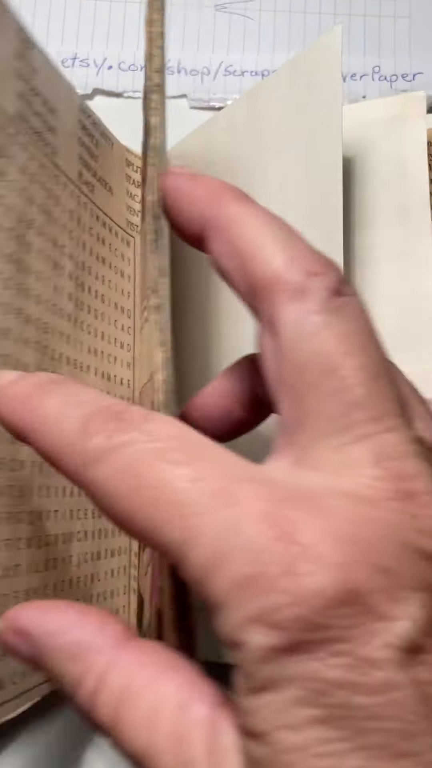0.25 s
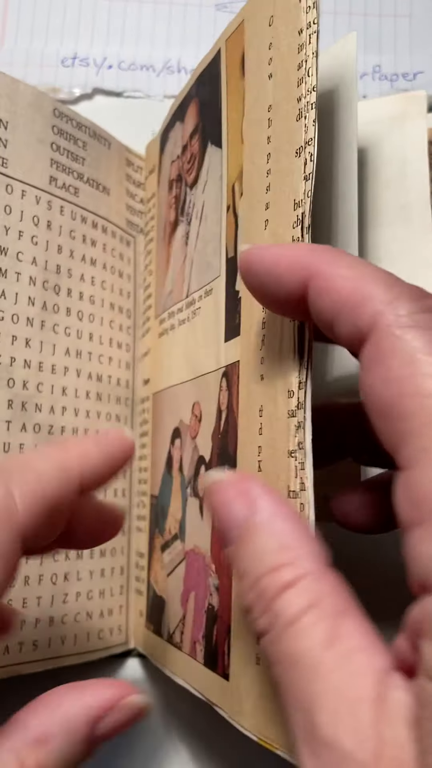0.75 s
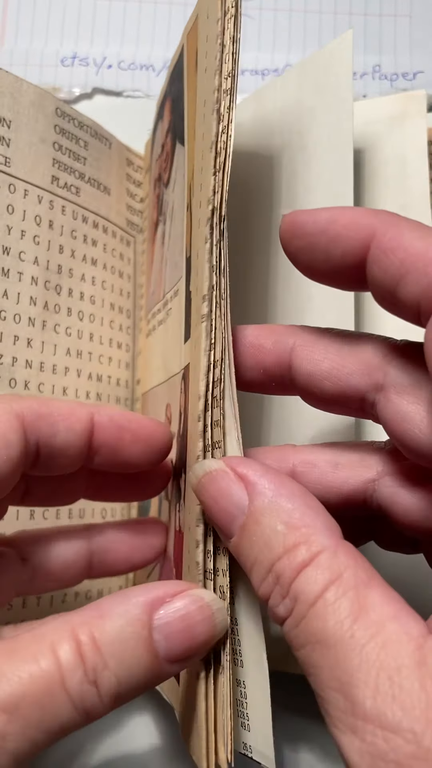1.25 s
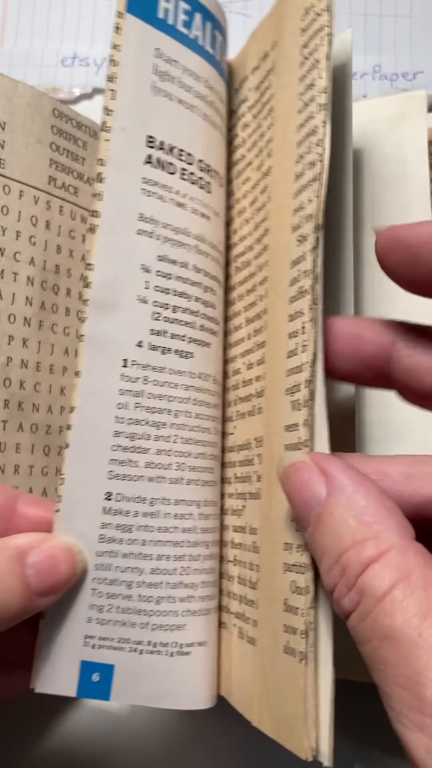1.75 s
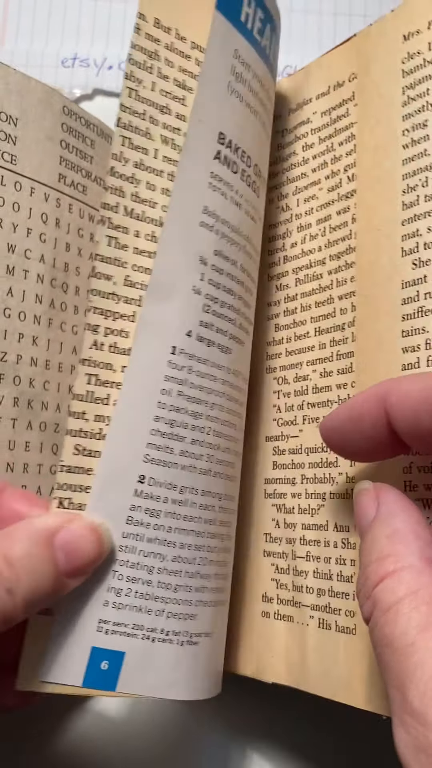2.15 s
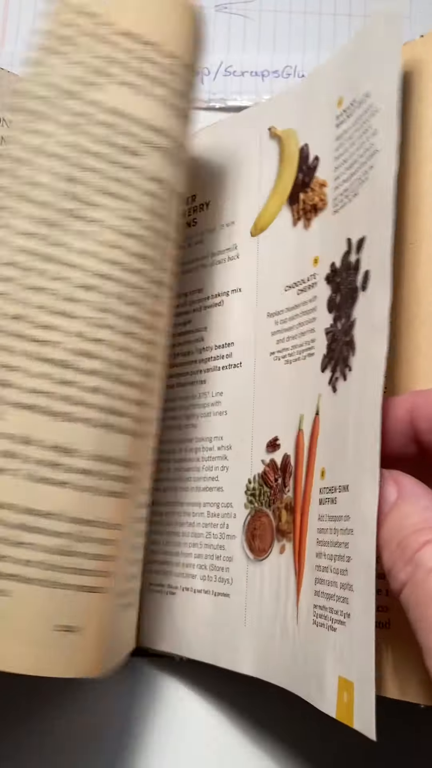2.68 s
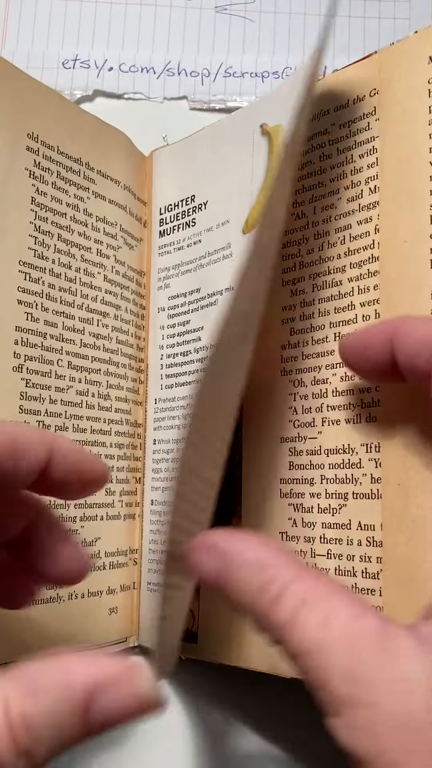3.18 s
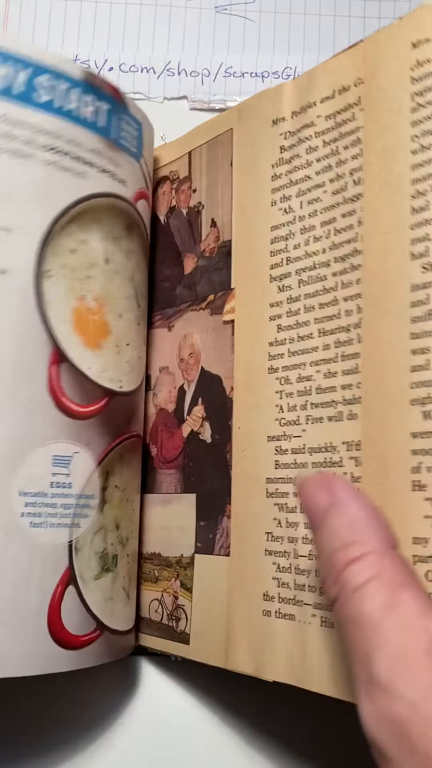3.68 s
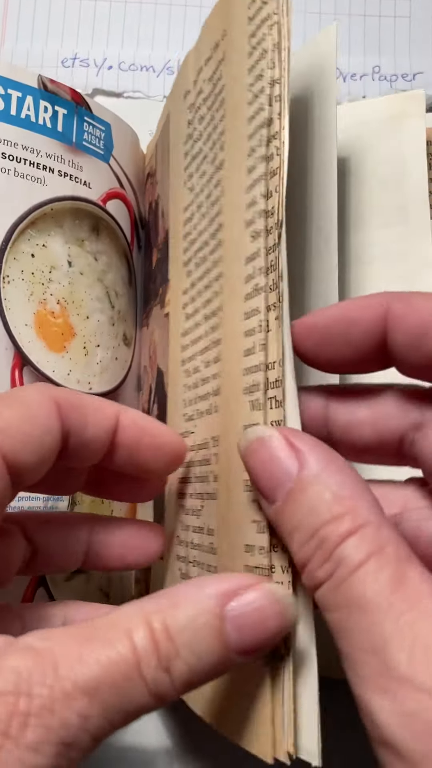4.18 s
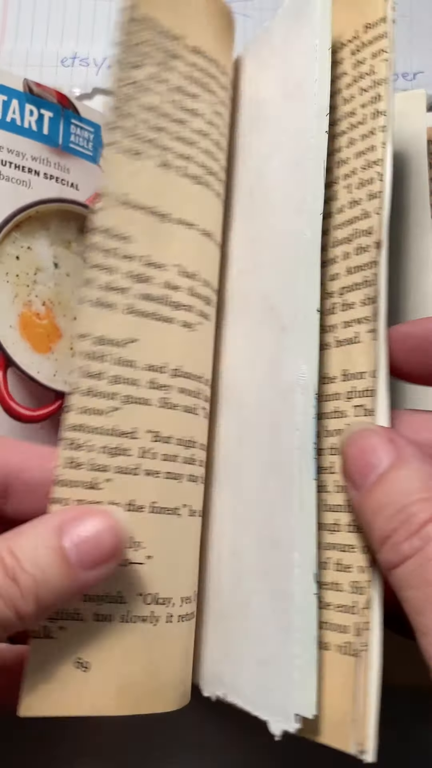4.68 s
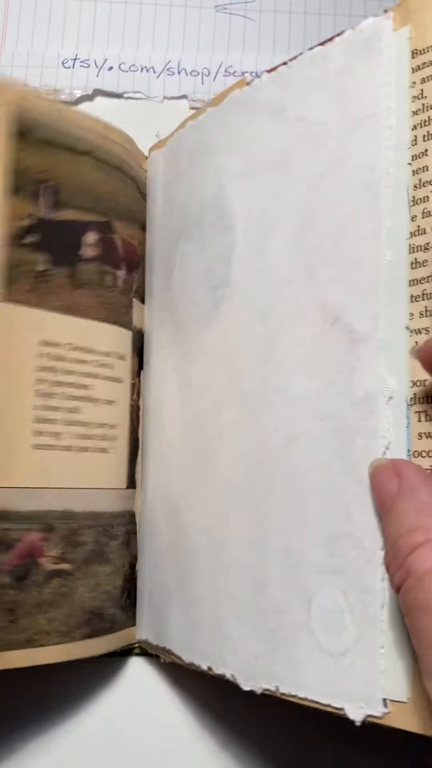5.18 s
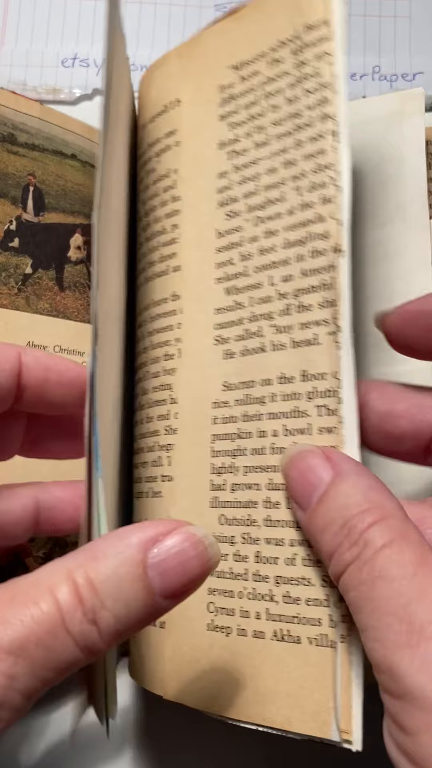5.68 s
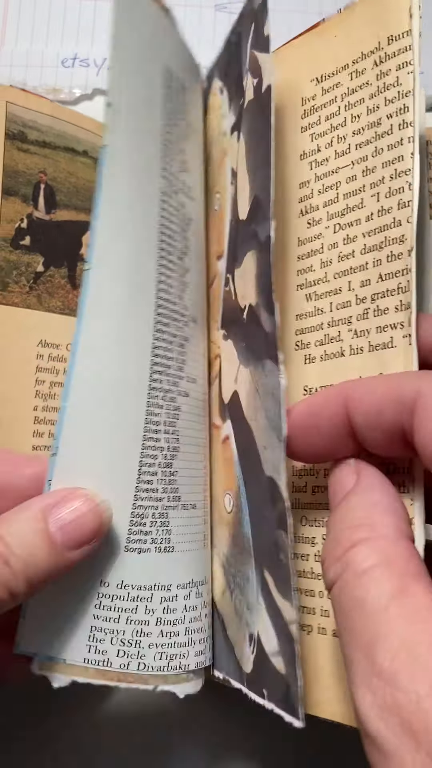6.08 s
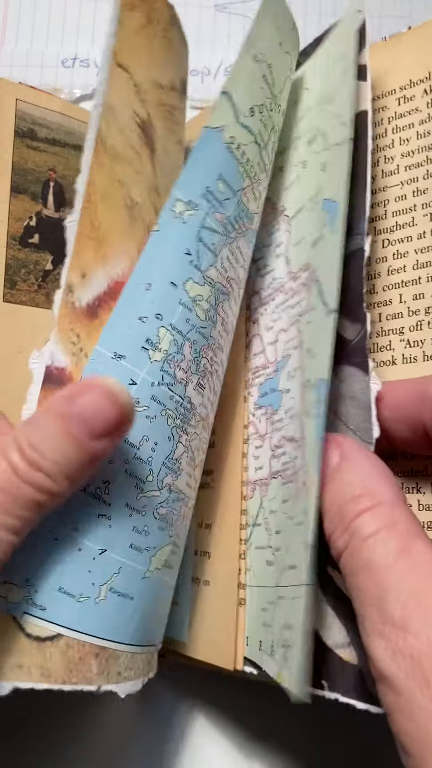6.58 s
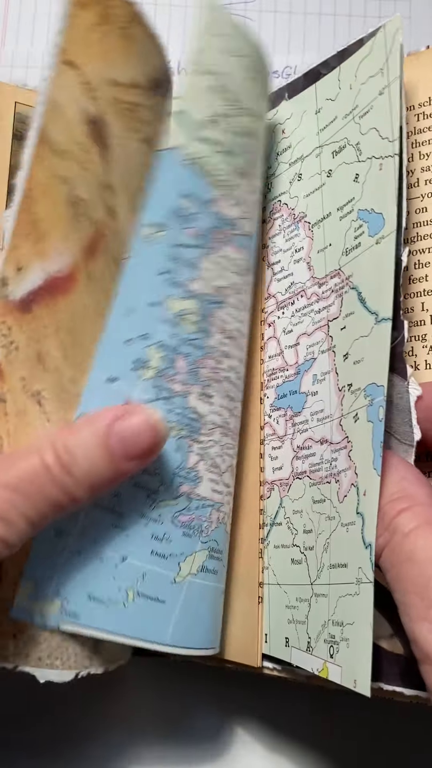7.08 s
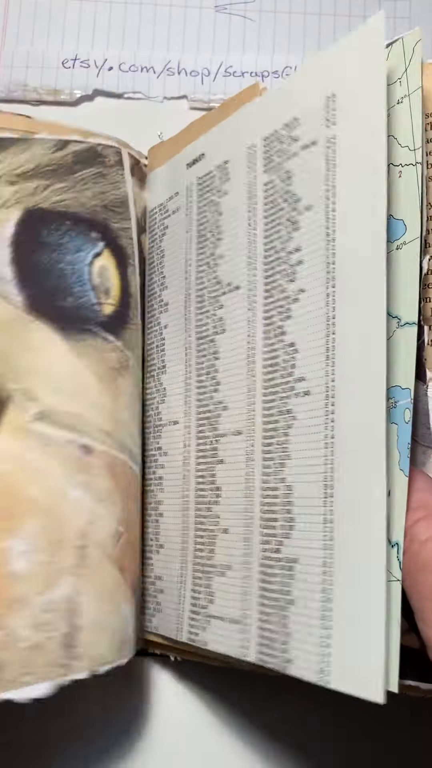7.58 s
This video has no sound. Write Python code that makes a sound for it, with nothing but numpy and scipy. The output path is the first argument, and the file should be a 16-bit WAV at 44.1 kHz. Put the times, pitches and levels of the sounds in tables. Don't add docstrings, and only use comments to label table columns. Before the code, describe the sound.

Hands leaf through an old paper book, sparse crackles at first, then crisp slaps and rustling clusters over faint low room rumble.

```python
import sys
import numpy as np
from scipy import signal
from scipy.fft import rfft, irfft, next_fast_len
from scipy.io import wavfile
from scipy.ndimage import uniform_filter1d

SR = 44100
rng = np.random.default_rng(int(sys.argv[2]) if len(sys.argv) > 2 else 0)


def generate_wav(signal):
    frames = np.transpose(np.atleast_2d(signal))
    scaled = np.clip(frames, -1, 1) * 32767
    pcm = np.round(scaled).astype(np.int16)
    wavfile.write(sys.argv[1], SR, pcm)


def to_linear_factor(level_db):
    exponent = np.asarray(level_db, float) / 20
    return 10 ** exponent


N = 346185

# frequency in Hz, level in dB
HISS_COLOUR = [(3500, -52), (5000, -3), (6500, -0.5), (8500, 0), (10500, -3), (12500, -6), (15500, -12),
               (17000, -22.5)]
WAFT_SWELL_S, WAFT_FADE_S = 0.11, 0.18


def evened(x):
    return x / np.sqrt(np.mean(x ** 2) + 1e-20)


def read(points, hz):
    f, value = np.transpose(points)
    return np.interp(np.log(hz + 1), np.log(f + 1), value)


def coloured(x, colour):
    log_gain = np.log(to_linear_factor(read(colour, abs(np.fft.fftfreq(4096, 1 / SR)))))
    spectrum = np.exp(np.conj(signal.hilbert(log_gain)))
    taps = np.fft.ifft(spectrum).real[:2048]
    return signal.oaconvolve(x, taps[None] / np.linalg.norm(taps), axes=1)[:, :N]


def wander(ms):
    size = max(int(ms * SR / 1000), 2)
    once = uniform_filter1d(rng.standard_normal(N), size)
    return evened(uniform_filter1d(once, size))


def bending(x, size, wide, long, patchy_db):
    z = signal.stft(x, nperseg=size)[2]
    patches = uniform_filter1d(rng.standard_normal(z.shape[1:]), wide, 0)
    patches = uniform_filter1d(patches, long, 1)
    gain = to_linear_factor(patchy_db * evened(patches))
    return signal.istft(z * evened(gain), nperseg=size)[1][:, :N]


def stroke(s, hold_s, swell_s, fade_s):
    near = slice(max(round((s - swell_s) * SR), 0), round((s + hold_s + fade_s) * SR))
    u = np.arange(*near.indices(N)) / SR - s
    slope = np.minimum(u / swell_s, (hold_s - u) / fade_s)
    return near, to_linear_factor(60 * np.minimum(slope, 0))


def fibres(flutter_db=0.8, clump_db=1.0, tick_per_s=380, tick_db=4.1):
    ticks = to_linear_factor(tick_db * np.minimum(rng.exponential(1, N), 4))
    ticks = ticks * (rng.random(N) < tick_per_s / SR)
    grain = 1 + 3.5 * signal.filtfilt([0.12], [1, -0.88], ticks)
    grip = to_linear_factor(flutter_db * wander(20) + clump_db * wander(3))
    sheet = bending(rng.standard_normal((2, N)), size=2048, wide=4, long=7, patchy_db=2.5)
    return evened(sheet * grain * grip)


def rubbing(rasp_db=-4, rasp_share=0.64, flap_db=-17):
    # time in seconds, pressure in dB, sheet bend in dB
    hands = [(0, -57, -10), (0.228, -65.5, -18), (.42, -82, -29), (.67, -72, -30), (.97, -73, -8),
             (1.157, -95, -15), (1.3, -84, -23), (2.02, -74, -7), (2.37, -86, -24), (2.66, -68, -13),
             (3.05, -82, -6), (3.56, -82, -3.5), (3.98, -71.5, -17), (4.22, -81, -19), (4.6, -72, 2),
             (5.44, -76, -19), (5.7, -80.5, -3), (7.85, -73.5, 4)]
    # start in seconds, pressure in dB, sheet bend in dB, contact in seconds
    nips = [(.037, -60.5, 5, 0.012), (.175, -60, -7, 0.0085), (1.667, -79.5, 23, 0.024),
            (1.713, -59, 10.5, 0.035), (2.111, -36.5, -8, 0.032), (2.25, -51.5, 5, 0.0071),
            (3.233, -45.5, -2, 0.02), (4.796, -56.5, 3.5, 0.058), (6.366, -42.5, -24, 0.054),
            (6.537, -42, -0.5, 0.025), (6.805, -54, 1, 0.069), (7.122, -47, 6.5, 0.027),
            (7.319, -46.5, -8, 0.039), (7.759, -53.5, -2, .006), (1.512, -49.5, -7.5, 0.016),
            (3.374, -63, -4.5, 0.14), (3.484, -58, 2, .03), (3.588, -60, -0.5, .15),
            (4.254, -65.5, -18, 0.03), (7.793, -47, -3, 0.023)]
    flicks = [
        (2.404, -69.5, 1, 0.084),
        (4.325, -69, -3, 0.069),
        (4.759, -55.5, -6, 0.075),
        (5.14, -41, -5.5, 0.019),
        (5.323, -67.5, 2, 0.022),
        (5.776, -46.5, -12.5, 0.014),
        (6.064, -59, 1, 0.028),
        (6.977, -51, 8, 0.022),
        (7.246, -76, 15, 0.0041),
    ]
    drags = [(.73, -68, -6, 0.011), (.592, -64, -22, 0.005), (.959, -56.5, -25, 0.0078),
             (1.576, -50.5, -1.5, 0.046), (4.162, -72, 2.5, 0.021), (1.213, -59.5, -18.5, 0.017),
             (5.546, -51.5, -10, 0.0079), (3.43, -60, -4, .05), (6.88, -46, -5, 0.041),
             (6.925, -43.5, -3, 0.05), (7.332, -43.5, 1.5, 0.0035), (7.499, -49, 0.5, 0.074)]
    brushes = [(.285, -62, -2, 0.028), (2.49, -75, 10, 0.034), (1.062, -72.5, -17, 0.025),
               (1.379, -67, 3, 0.04), (2.167, -38, -7, 0.0048), (2.602, -71.5, 4.5, 0.01),
               (2.751, -51.5, -4.5, 0.03), (3.184, -54.5, -7.5, 0.017), (3.834, -51, -3.5, 0.037),
               (4.521, -64, -3.5, 0.038), (4.622, -53.5, -5, 0.031), (5.952, -67.5, 2.5, 0.038),
               (6.692, -48, -2.5, 0.04), (7.03, -45.5, -1, 0.048)]
    slides = [(0, -63, -1.5, 0.12), (.753, -66, -12, 0.0035), (1.213, -72, -14, 0.19),
              (1.754, -82, 10, 0.0081), (3.851, -57.5, -5, 0.032), (4.476, -62, -12, 0.012),
              (4.815, -60.5, 6, 0.026), (4.981, -67, 2, 0.012), (5.783, -65.5, -3.5, 0.32),
              (6.273, -59, 15, 0.056), (6.88, -48.5, 4.5, 0.22), (7.13, -47.5, -1.5, 0.2)]
    settles = [
        (1.493, -70, 5, 0.16),
        (2.129, -55.5, 5, 0.0023),
        (2.46, -68.5, 1.5, 0.012),
        (2.798, -58.5, -6, 0.072),
        (5.154, -50.5, -0.5, 0.016),
        (6.2, -45.5, 1, 0.25),
    ]
    peels = [
        (2.78, -73, -9, 0.0067),
        (3.229, -67, 3.5, 0.069),
        (5.59, -60, -2, 0.014),
        (6.731, -48.5, 0.5, 0.0017),
        (7.49, -56, 5, 0.0083),
        (7.71, -45, -3, 0.00095),
    ]
    # start in seconds, level in dB, length in seconds
    edges = [
        (4.247, -75.5, 0.028),
        (5.54, -62.5, 0.045),
    ]
    # start in seconds, level in dB, length in seconds
    wafts = [(0, -67.5, 0.062), (1.86, -72, 0.017), (2.248, -56, 0.015), (2.405, -72.5, 0.042),
             (3.242, -68, 0.039), (3.483, -60, 0.0067), (4.815, -79, .02), (4.934, -67, 0.0087),
             (5.096, -60.5, 0.064), (6.6, -58.5, 0.057), (7.289, -55, 0.042), (7.676, -55, 0.071)]

    def parts(press_db, bend_db):
        rasp = rasp_share * bend_db + rasp_db
        return to_linear_factor(press_db + np.array([0 * bend_db, bend_db, rasp, bend_db + flap_db]))

    s, press_db, bend_db = np.transpose(hands)
    t = np.arange(N) / SR
    power = parts(np.interp(t, s, press_db), np.interp(t, s, bend_db)) ** 2
    kinds = [(nips, 0.041, 0.028), (flicks, 0.051, 0.068), (drags, 0.14, 0.037), (brushes, 0.14, 0.053),
             (slides, 0.15, 0.2), (settles, 0.22, 0.46), (peels, 0.69, 0.17)]
    for rows, swell_s, fade_s in kinds:
        for s, press_db, bend_db, hold_s in rows:
            near, shape = stroke(s, hold_s, swell_s, fade_s)
            power[:, near] += np.outer(parts(press_db, bend_db), shape) ** 2
    for part, rows in zip(power[-2:], (edges, wafts)):
        for s, level_db, hold_s in rows:
            near, shape = stroke(s, hold_s, WAFT_SWELL_S, WAFT_FADE_S)
            part[near] += (to_linear_factor(level_db) * shape) ** 2
    return np.sqrt(power)


def room_tone():
    # frequency in Hz, level in dB
    mid_colour = [(20, -15), (40, -4), (75, 3), (160, -10.5), (330, -17), (450, -27.5), (900, -31),
                  (2000, -28), (4500, -24.5), (6000, -52)]
    side_colour = [(15, -33.5), (25, 4.5), (53, -1.5), (141, -2), (293, -10), (374, -3), (477, -11),
                   (582, -4.5), (868, -10), (1650, -13.5), (5000, -20), (6500, -26), (11000, -120)]
    mid = to_linear_factor(-76.5) * coloured(rng.standard_normal((1, N)), mid_colour)[0]
    side = to_linear_factor(-75) * coloured(rng.standard_normal((1, N)), side_colour)[0]
    return bending(np.array([mid + side, mid - side]), size=1024, wide=6, long=12, patchy_db=2.0)


def pockets(x, drain=0.1, ease_s=0.013):
    # start in seconds, length in seconds, pitch in Hz, lift in dB
    still = [(0, 0.059, 700, 7), (1.2, 0.081, 4650, 3), (1.477, 0.049, 4530, -3), (1.662, 0.044, 600, 8),
             (1.857, 0.027, 694, 11), (2.028, 0.22, 1010, 8), (2.139, 0.082, 4640, 9.5),
             (2.24, 0.071, 596, 8), (2.396, 0.057, 860, 9.5), (2.453, 0.15, 840, 10),
             (2.69, 0.03, 1440, -10), (2.725, 0.087, 595, 11), (2.83, 0.29, 3000, 7),
             (2.915, 0.046, 596, 21), (3.132, 0.072, 2530, 9), (3.216, 0.059, 1900, 4),
             (3.395, 0.11, 4560, 4), (3.472, 0.043, 1060, 3.5), (3.79, 0.13, 2170, 7.5),
             (4.244, 0.06, 4480, 11), (4.573, 0.053, 1390, 6), (4.6, 0.07, 4370, 8.0), (4.7, 0.03, 1050, 4),
             (4.762, 0.1, 1420, 7), (5.068, 0.025, 870, 11), (5.31, 0.16, 700, 14.5),
             (5.49, 0.048, 2450, 2.5), (5.54, 0.14, 2170, 5), (5.93, 0.065, 1360, 5),
             (6.157, 0.13, 880, 6.5), (6.388, 0.12, 4700, 5.5), (6.602, 0.061, 590, -6),
             (6.676, 0.083, 4500, 5), (7.125, 0.048, 590, 16), (7.269, 0.066, 1030, 8),
             (7.631, 0.036, 760, 14.5), (7.701, 0.027, 696, 10), (.5, .75, 14000, 6), (2.08, .2, 14000, -4),
             (4.96, .14, 8600, 4)]
    # start in seconds, length in seconds, first pitch in Hz, last pitch in Hz, lift in dB
    glides = [(0.093, 0.19, 1350, 1140, -17), (6.2, 0.11, 1430, 1540, -12), (3.6, 0.051, 2900, 3100, 6),
              (.27, 0.046, 2000, 1750, 6), (1.7, .05, 3700, 4000, -6.5), (2.07, 0.29, 2200, 1600, -3.5),
              (2.066, 0.102, 3450, 4130, -10), (3.7, 0.13, 1260, 1900, 7), (5.118, 0.052, 3200, 3900, -11),
              (5.305, 0.079, 2200, 2000, -11), (5.486, 0.2, 2560, 1970, 8.5), (5.5, 0.34, 1070, 2160, 2.5),
              (5.7, 0.21, 3200, 2870, 7.5), (6.363, 0.11, 1530, 1400, -7), (6.1, 0.12, 1070, 2130, 9.5),
              (6.82, 0.31, 3900, 2600, -3), (6.862, 0.18, 1330, 1150, 6), (6.87, 0.21, 2300, 2100, 6.5),
              (7.64, 0.09, 3000, 3100, 6), (7.636, 0.089, 1080, 1050, -5.5)]
    wedges = [(s, length_s, f, f, db, 0.31) for s, length_s, f, db in still]
    wedges += [(*row, 0.17) for row in glides]
    hz, t, z = signal.stft(x, SR, nperseg=256)
    field_db = np.zeros(z.shape[1:])
    for s, length_s, from_hz, to_hz, lift_db, width in wedges:
        near = (t > s - ease_s) & (t < s + length_s + ease_s)
        u = t[near] - s
        pitch_hz = from_hz + (to_hz - from_hz) * u / length_s
        octaves = np.log2((hz[:, None] + 1) / pitch_hz) / width
        bump = np.exp(-octaves ** 2 / 2) - drain * np.exp(-(octaves / 4) ** 2 / 2)
        opening = np.clip(np.minimum(u, length_s - u) / ease_s + 1, 0, 1)
        field_db[:, near] += lift_db * bump * opening
    return signal.istft(z * to_linear_factor(field_db), SR, nperseg=256)[1][:, :N]


def snaps(push_ms=3.13, slap_ms=4.7, lead_db=-20, lead_s=0.0084):
    # start in seconds, crack in dB, body re crack in dB, thump re crack in dB
    clicks = [(.102, -40.5, -7, -51), (1.265, -44, -9.5, -30), (1.819, -61, -38, -24),
              (1.911, -56, -6, -27), (3.289, -48, 1, -11), (4.1, -54.5, -3.5, -21), (6.609, -44, -13, -19),
              (1.488, -42.5, -7.5, -23), (1.033, -63, -11, -22), (4.065, -63, -0.5, -27),
              (5.817, -61, 5, -29), (6.039, -52, 0, -21)]
    ticks = [(1.921, -55, -3, -28), (2.698, -56, 9, -14.5), (2.814, -64.5, 15.5, -7), (3.011, -69, 3.5, -6),
             (3.616, -60.5, 21, -0.5), (.201, -54.5, -28, -39), (2.21, -52.5, 0, -4),
             (4.245, -60, -14, -37), (5.323, -72, 20, -14), (5.376, -66, 8, -17), (5.456, -76, 15, 10)]
    cracks = [
        (2.265, -38.5, 2.5, -3.5),
        (2.449, -60.5, 6, 2),
        (3.704, -61, 10, -8),
        (4.571, -62.5, 13.5, 0.5),
        (4.706, -45, -1.5, -7),
        (5.207, -57.5, 19.5, -3),
        (7.658, -43, -3, -24),
        (7.277, -55, 12, -6),
    ]
    pops = [
        (2.464, -52, -3, -29),
        (2.91, -50, -1.5, -6),
        (3.798, -49, -1.5, -23),
        (7.446, -54.5, 9.5, -11),
        (7.647, -44.5, 13, -3),
        (7.704, -68, 9, -12),
    ]
    slaps = [
        (.02, -50.5, 3.5, -0.5),
        (3.216, -40, -2, -21),
        (3.481, -52, 9.5, -10),
        (4.933, -72.5, 21.5, 10),
        (5.077, -35.5, 0, -15.5),
        (5.926, -52, -1.5, -33),
        (7.692, -49.5, 18.5, -4),
    ]
    claps = [
        (.694, -54, -34, -42),
        (1.863, -47, 8, -2),
        (4.964, -40, -3.5, -11),
        (5.558, -50, -6, -14),
    ]
    # start in seconds, crack in dB
    flecks = [(.236, -62), (.344, -67), (.351, -68), (.5, -73), (.62, -70), (.853, -67), (1.007, -66),
              (1.244, -65), (1.257, -59), (1.48, -57), (1.483, -58), (1.491, -45), (1.493, -58),
              (1.83, -69), (1.837, -62), (4.06, -65), (4.127, -70), (4.473, -59), (4.537, -60),
              (5.081, -38), (5.551, -48), (5.589, -52), (5.952, -58), (6.375, -40), (5.828, -60),
              (6.017, -51), (6.056, -51), (6.141, -57)]
    flecks = [(*row, -12, -40) for row in flecks]  # body, thump in dB
    kinds = [(clicks, (0.0004, 0.007, 17.5)), (ticks, (0.0025, 0.014, 16)), (cracks, (0.0016, 0.04, 7.2)),
             (pops, (0.00042, 0.08, 14.8)), (slaps, (0.0018, 0.069, 1.2)), (claps, (0.0125, 0.0079, 2)),
             (flecks, (0.0004, 0.007, 17.5))]
    buckles = [(*row, *kind) for rows, kind in kinds for row in rows]
    early = SR // 40
    t = np.arange(SR // 8) / SR
    strain = to_linear_factor(lead_db) * np.exp(-np.arange(early, 0, -1) / SR / lead_s)
    noise = rng.standard_normal((len(buckles), 2, len(t)))
    out = np.zeros((4, 2, N + SR))
    for (s, crack_db, body_db, thump_db, hold_s, t60_s, click_db), burst in zip(buckles, noise):
        at = max(round(s * SR), 0)
        hold_s = max(hold_s, 0.0003)
        rise = 1 - np.exp(-t / (0.0004 + 0.2 * min(hold_s, 0.003)))
        shape = rise * to_linear_factor(-60 * np.maximum(t - hold_s, 0) / max(t60_s, 0.005)) * burst
        shape[:, 8] += to_linear_factor(click_db)
        push = 0.2 * np.exp(-(t * 1000 / push_ms - 1.5) ** 2)
        push = push + 1.76 * np.exp(-t * 1000 / slap_ms) * burst
        levels = to_linear_factor(crack_db + np.array([0, body_db, 0.36 * body_db - 7.0, thump_db]))[:, None, None]
        out[:, :, at:at + len(t)] += levels * np.array([shape, shape, shape, push])
        before = out[:3, :, max(at - early, 0):at]
        before += levels[:3] * (strain * burst[:, -early:])[:, early - before.shape[-1]:]
    return out[..., :N]


def rings(rise_s=0.00047):
    # start in seconds, pitch in Hz, level in dB, t60 in seconds
    patches = [(.037, 890, -51.5, 0.023), (2.411, 1090, -59, 0.027), (2.814, 1180, -48.5, 0.018),
               (1.864, 765, -38.5, 0.016), (2.25, 1120, -42.5, 0.025), (2.265, 775, -24, 0.007),
               (2.449, 700, -49, 0.014), (2.697, 1360, -47, 0.022), (3.25, 1755, -42, 0.026),
               (3.616, 1730, -27.5, 0.0091), (3.621, 1565, -40, 0.023), (4.571, 1530, -47.5, 0.016),
               (4.705, 1160, -48, 0.016), (4.963, 1120, -38, 0.019), (4.963, 4120, -46.5, 0.074),
               (5.206, 1870, -41, 0.015), (6.038, 1490, -50, 0.0063), (6.056, 1470, -56, 0.0097),
               (6.064, 1300, -48, 0.0094), (7.177, 1370, -47, 0.018), (7.25, 1370, -41.5, .025),
               (7.275, 1270, -41, 0.0098), (7.299, 1360, -40, 0.023), (7.324, 1410, -43, 0.0089),
               (7.339, 1360, -36, 0.013), (7.445, 1290, -37.5, 0.012), (7.647, 1390, -37, 0.016),
               (7.695, 1750, -35.5, 0.023)]
    out = np.zeros(N + SR)
    t = np.arange(SR // 10) / SR
    rise = 1 - np.exp(-(t / rise_s) ** 2)
    for s, ring_hz, level_db, t60_s in patches:
        at = round(s * SR)
        decay = to_linear_factor(level_db - 60 * t / max(t60_s, 0.005))
        out[at:at + len(t)] += rise * decay * np.sin(2 * np.pi * ring_hz * t)
    return out[:N]


def creak(start_s=0.875, end_s=1.015, from_hz=280, to_hz=240, level_db=-76):
    u = np.clip((np.arange(N) / SR - start_s) / (end_s - start_s), 0, 1)
    pitch_hz = (from_hz + (to_hz - from_hz) * u) * (1 + 0.06 * wander(5))
    turn = 2 * np.pi * np.cumsum(pitch_hz) / SR
    tone = np.sin(turn) + 0.4 * np.sin(3 * turn)
    return to_linear_factor(level_db) * np.sin(np.pi * u) * tone * np.array([[1.7], [0.1]])


def buffets():
    # start in seconds, level in dB, length in seconds
    gusts = [(1.51, -71, 0.036), (2.277, -75, 0.022), (2.915, -71.5, 0.02), (3.497, -70, 0.021),
             (3.886, -86, 0.083), (4.714, -78, .02), (4.98, -73, .03), (4.567, -73, 0.018),
             (5.115, -68, .1), (5.267, -79, 0.081), (6.057, -76, .02), (6.587, -75, .04),
             (7.313, -66, 0.027), (7.651, -61.5, 0.076)]
    # frequency in Hz, level in dB
    gust_colour = [(25, -42), (70, 6), (130, -0.5), (260, -9.5), (500, -52)]
    level = np.zeros(N)
    for s, gust_db, hold_s in gusts:
        near, shape = stroke(s, hold_s, WAFT_SWELL_S, WAFT_FADE_S)
        level[near] += to_linear_factor(gust_db) * shape
    return coloured(level * rng.standard_normal((2, N)), gust_colour)


def pages():
    # frequency in Hz, level in dB
    rasp_colour = [(2000, -29.5), (2800, 1.5), (3200, -3), (4000, 1.5), (5000, -7), (6000, -14.5)]
    sheet_colour = [(500, -32), (850, 1.5), (1200, 5.5), (1600, 6), (2100, 4.5), (2500, 3.5), (3300, -50.5)]
    flap_colour = [(60, -10.5), (130, -14), (250, -4.5), (450, 3.5), (750, 5), (1100, -42)]
    thump_colour = [(25, -39), (55, -0.5), (85, 7), (130, 9.5), (250, 8.5), (600, 8.5), (1100, -14.5)]
    noise = fibres()
    hiss, body, rasp, flap = rubbing()
    crack, knock, scratch, thump = snaps()
    out = coloured(noise * hiss + crack, HISS_COLOUR) * to_linear_factor(3.5)
    out += coloured(noise * body + knock, sheet_colour) * to_linear_factor(-7.5)
    out += coloured(noise[::-1] * rasp + scratch, rasp_colour) * to_linear_factor(-1.5)
    out += coloured(noise * flap, flap_colour) * to_linear_factor(-3.5)
    out = bending(out, size=256, wide=4, long=14, patchy_db=1.1)
    return pockets(out) + rings() + coloured(thump, thump_colour) * to_linear_factor(-0.5) + buffets()


def room(x):
    # frequency in Hz, t60 in seconds
    room_t60 = [(200, 0.096), (1500, 0.083), (8000, 0.026)]
    taps = np.zeros(SR // 2)
    at = np.arange(200, SR // 2 - 20, 20)
    taps[at + rng.integers(0, 20, len(at))] = rng.choice([-1., 1.], len(at))
    hz, t, z = signal.stft(taps, SR, nperseg=256)
    decay = to_linear_factor(-60 * t / read(room_t60, hz)[:, None])
    tail = signal.istft(z * decay, SR, nperseg=256)[1]
    return signal.oaconvolve(x, tail[None] / np.linalg.norm(tail), axes=1)[:, :N]


def ports(x, sway=0.22, sway_hz=4500, sway_width_hz=1500):
    # frequency in Hz, lag in radians
    port_lag = [(0, 0.05), (450, 0), (950, -1.35), (1600, 0.4), (2200, 1), (2600, 0.9), (3100, 1),
                (3400, 1.13), (3800, 1.4), (4400, 1.44), (5300, 3.03), (8500, 6.28), (14800, 12.34),
                (22050, 18.3)]
    # frequency in Hz, level difference in dB
    port_balance = [(60, -4), (500, 1), (800, 2.5), (1150, -7), (1900, -7), (2700, -4), (4200, -3),
                    (5200, 4.5), (16000, -1.5)]
    # frequency in Hz, shared part from 0 to 1
    port_same = [(60, .8), (2000, .86), (2400, .65), (2800, .75), (3200, .5), (4000, .8), (4500, .88),
                 (5200, .997), (7500, .985), (11600, .99), (16000, .96)]
    hz, t, (shared, own) = signal.stft(x, SR, nperseg=512)
    same = np.clip(read(port_same, hz), 0, 1)[:, None]
    drift = np.interp(t * SR, np.arange(N), wander(70))
    lag = np.interp(hz, *np.transpose(port_lag))[:, None]
    lag = lag + sway * np.outer(np.exp(-((hz - sway_hz) / sway_width_hz) ** 2), drift)
    lag = lag * (1 + 0.007 * drift[::-1])
    right = (same * shared + np.sqrt(1 - same ** 2) * own) * np.exp(-1j * lag)
    right *= to_linear_factor(-read(port_balance, hz))[:, None]
    return signal.istft(np.array([shared, right]), SR, nperseg=512)[1][:, :N]


def scene():
    paper = pages()
    air = to_linear_factor(-116.5) * coloured(rng.standard_normal((2, N)), HISS_COLOUR)
    return ports(paper + to_linear_factor(-19) * room(paper) + air) + room_tone() + creak()


def late_bass(x, lag_turns=0.97, level_off_hz=39.4):
    size = next_fast_len(N + SR // 4)
    hz = np.fft.rfftfreq(size, 1 / SR)
    turns = lag_turns * np.log(1 + hz / level_off_hz)
    return irfft(rfft(x, size) * np.exp(-2j * np.pi * turns), size)[:, :N]


def joint_stereo(x, lead=230, jitter_db=2.8, attack_db=9):
    # frequency in Hz, margin in dB
    masked = [(1500, 20), (3000, 10), (5450, 7.5), (8500, 12.5), (11600, 10), (14000, 8), (15500, 1),
              (17000, -5)]
    # frequency in Hz, level in dB
    faint_floor = [(1200, -125), (2400, -102), (4800, -97), (6000, -125)]
    pair = np.pad([x[0] + x[1], x[0] - x[1]], ((0, 0), (lead, 0))) / 2
    window = np.sin(np.pi * (np.arange(2048) + 0.5) / 2048)
    hz, t, z = signal.stft(pair, SR, window, 2048, 1024)
    band = np.arange(len(hz)) // 16
    band_hz = hz[::16] + 170
    power = np.add.reduceat(abs(z) ** 2, np.arange(0, len(hz), 16), axis=1)
    power_db = 10 * np.log10(power + 1e-20)
    jitter = evened(uniform_filter1d(rng.standard_normal(len(t)), 3))
    jitter = jitter + 0.55 * rng.standard_normal(power_db.shape[1:])
    margin_db = read(masked, band_hz)[:, None] + jitter_db * jitter
    total_db = 10 * np.log10((abs(z[:, 200:]) ** 2).sum((0, 1)) + 1e-20)
    steady = np.diff(total_db, prepend=0) < attack_db
    floor_db = read(faint_floor, band_hz)[:, None] + jitter_db * rng.standard_normal(power_db.shape)
    weaker = power_db < power_db[::-1] - margin_db
    dropped = (weaker | (power_db < floor_db)) & steady
    kept = z * ~dropped[:, band]
    mid, side = signal.istft(kept, SR, window, 2048, 1024)[1][:, lead:lead + N]
    return np.array([mid + side, mid - side])


def low_pass(x):
    return signal.sosfilt(signal.butter(12, 16820, fs=SR, output="sos"), x)


def record(dry):
    edge = signal.firwin(255, 15800, window=("kaiser", 3), fs=SR)
    limited = signal.oaconvolve(late_bass(dry), edge[None], "same", axes=1)
    return low_pass(joint_stereo(limited))


dry = scene()
out = record(dry)
generate_wav(out)
```